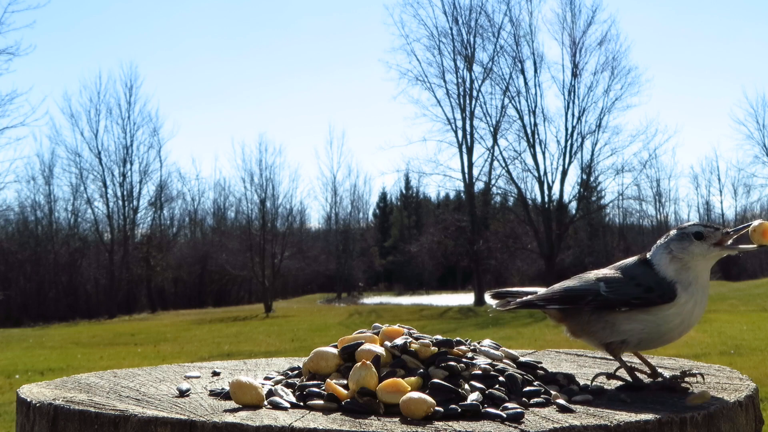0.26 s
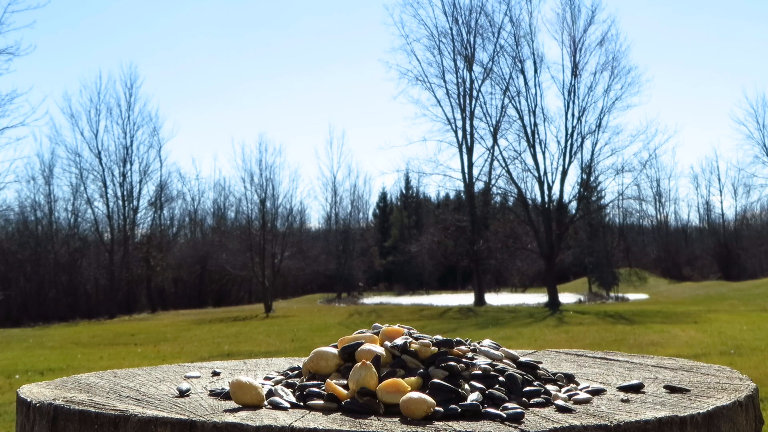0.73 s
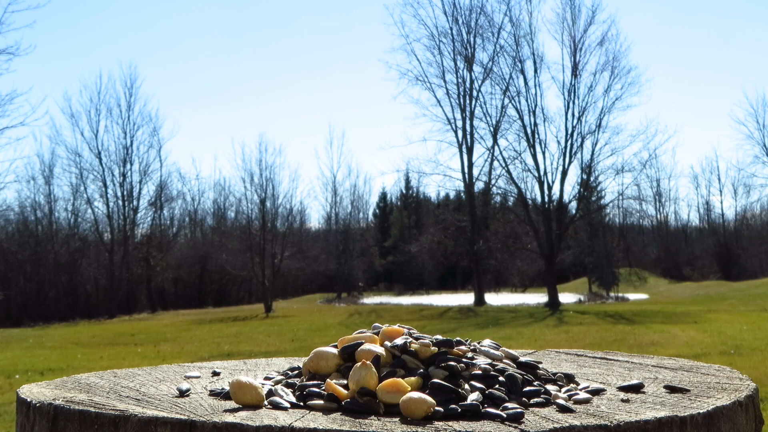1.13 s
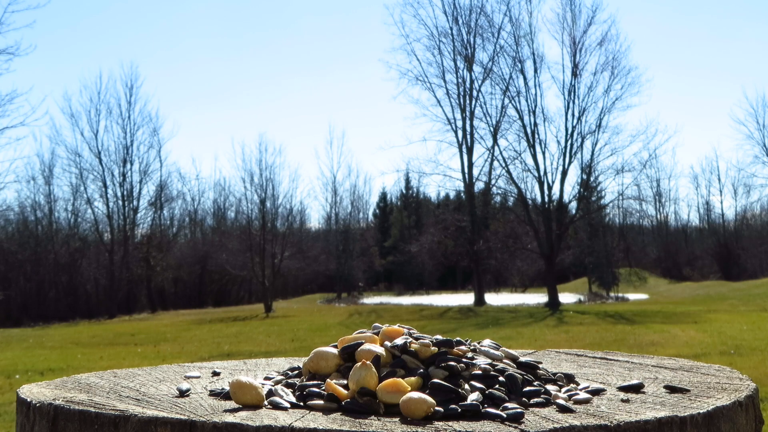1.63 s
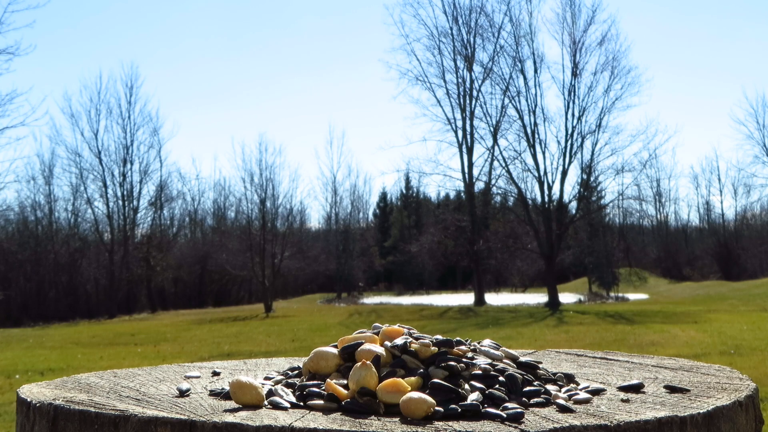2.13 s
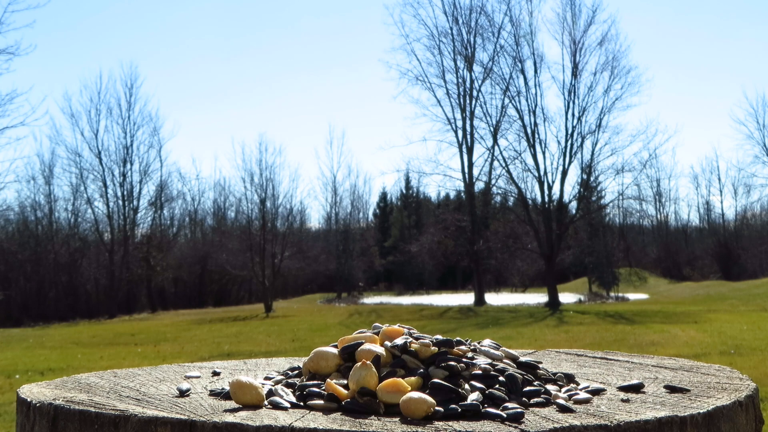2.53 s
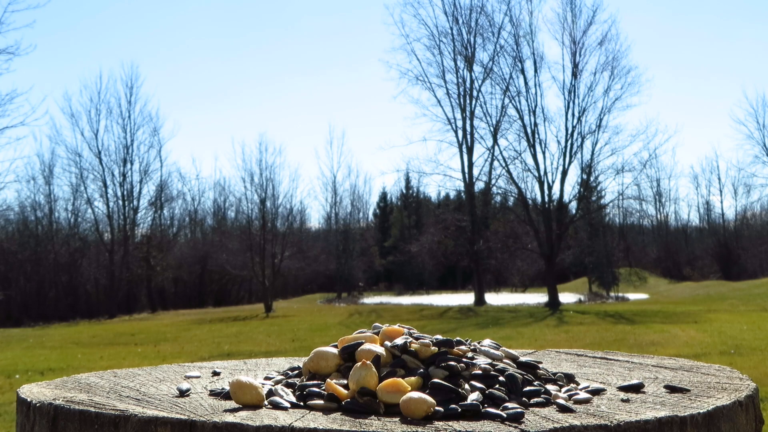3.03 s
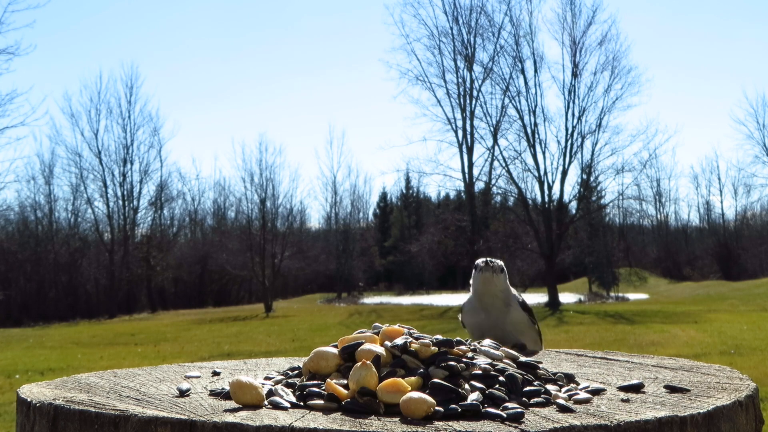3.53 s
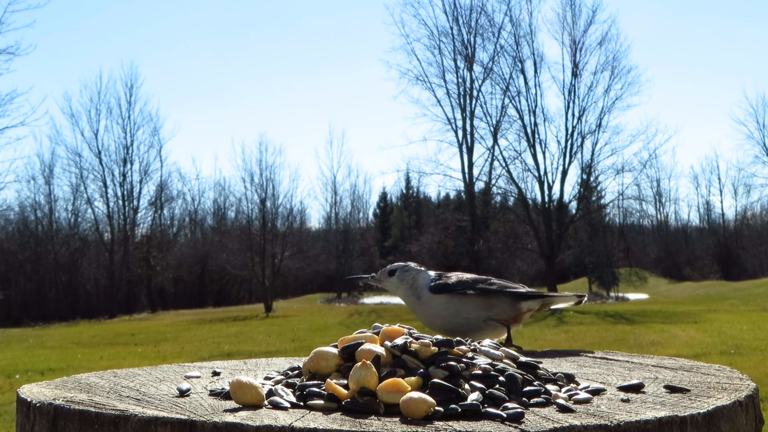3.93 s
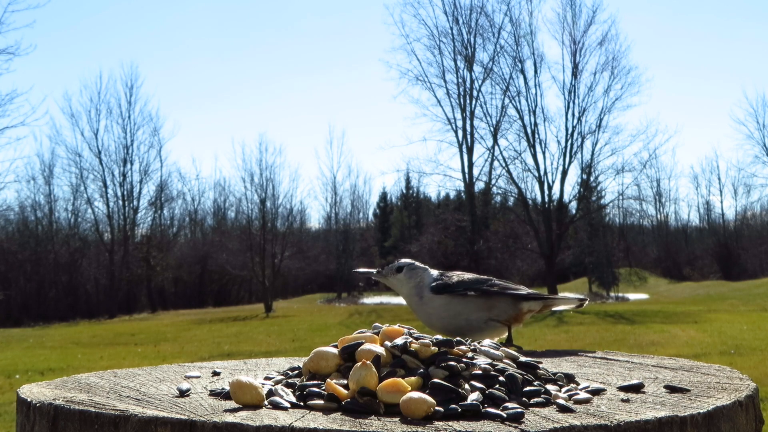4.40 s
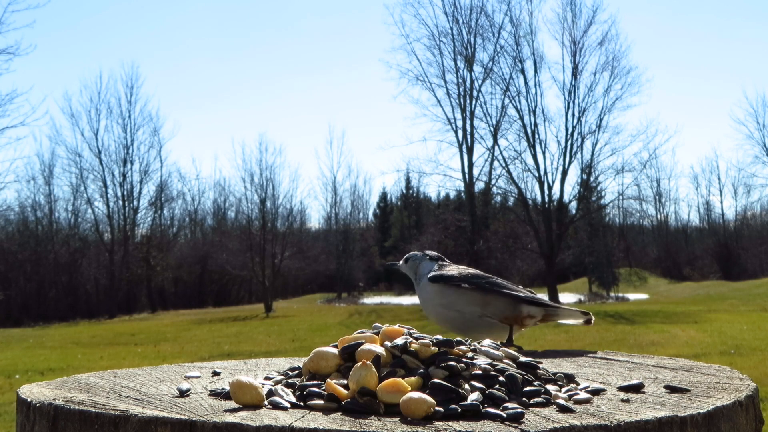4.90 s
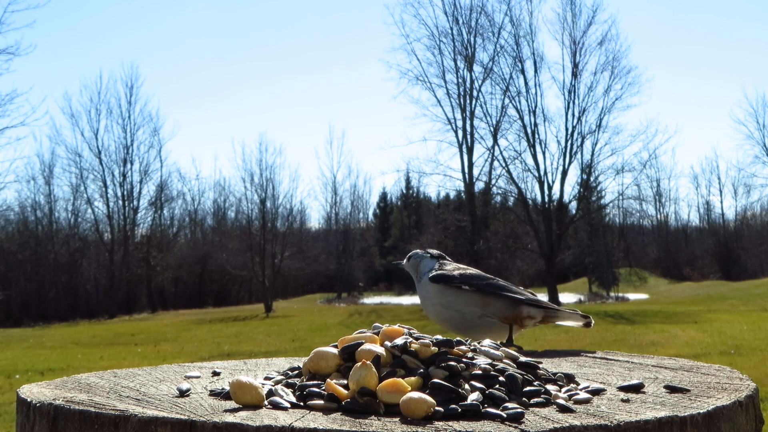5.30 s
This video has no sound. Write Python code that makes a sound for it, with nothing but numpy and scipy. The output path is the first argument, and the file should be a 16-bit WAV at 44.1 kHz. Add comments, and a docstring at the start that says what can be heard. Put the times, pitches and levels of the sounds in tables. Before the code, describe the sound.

Close to the microphone, a small bird's claws tick faintly over seeds on a wooden stump. One sharp snap follows, and it leaves on whirring wings. Three faint, short calls come from afar. The bird flutters softly back, lands with a light tap and gives two louder nasal calls. Far traffic, a soft hiss and a faint hum lie over the open lawn throughout, and a breeze twice brushes the microphone.

```python
"""Far traffic, a soft hiss and a faint hum lie over an open lawn, while one distant vehicle drones away. Close
by, a nuthatch ticks over the seeds of a stump feeder; its feet scuff, and there is one sharp snap. It leaves on
whirring wings whose draft rumbles low, and two calls come from afar, each a harmonic series shaped by throat
and beak. It calls again, flutters back, lands and gives two louder nasal calls, the last followed by a brief
gust."""
import sys
import numpy as np
from scipy import signal
from scipy.fft import rfft, irfft, next_fast_len
from scipy.io import wavfile
from scipy.ndimage import uniform_filter1d

SR = 44100
rng = np.random.default_rng(int(sys.argv[2]) if len(sys.argv) > 2 else 0)


def materialize(psi):
    """Save the field psi as 16-bit PCM at rate SR to the path in sys.argv[1].

    A 1-D psi becomes a single channel; in a 2-D psi each row is a channel.
    """
    bounded = np.clip(np.atleast_2d(psi).T, -1, 1)
    quanta = np.round(bounded * 32767).astype(np.int16)
    wavfile.write(sys.argv[1], SR, quanta)


N = 245195
TIME = np.arange(N) / SR


def undb(db):
    """Amplitude ratio of a level in decibels."""
    return 10 ** (np.asarray(db) / 20)


def unit(x):
    """Normalisation to rms 1."""
    return x / np.sqrt(np.mean(x ** 2) + 1e-30)


def gain_at(hz, points):
    """Gain of a (frequency_hz, level_db) curve on a log axis, falling 12 dB an octave past its end."""
    knots_hz, db = np.transpose(points)
    rolloff = np.maximum(hz / knots_hz[-1], 1) ** 2
    return undb(np.interp(np.log(hz + 1e-9), np.log(knots_hz), db)) / rolloff


def colour(x, points):
    """Zero-phase filtering: the spectrum is multiplied by a gain curve."""
    size = next_fast_len(len(x))
    return irfft(rfft(x, size) * gain_at(np.fft.rfftfreq(size, 1 / SR), points), size)[:len(x)]


def noise(points):
    """Filtered white noise of rms 1."""
    return unit(colour(rng.standard_normal(N), points))


def pan(x, db):
    """Direction by level difference, left minus right."""
    return x * undb(np.array([[db], [-db]]) / 2)


def near(points, side_db):
    """Coherence: noise from a small, close source is mostly alike in both ears."""
    return noise(points) + undb(side_db) * noise(points) * np.array([[1], [-1]])


def diffuse(points):
    """A diffuse field: noise from all around is alike in the bass, wide in the low middle."""
    # side against mid: frequency_hz, gain_db
    width = [(25, -15), (60, -19), (120, -3.5), (250, 1), (400, 4.5), (700, 0), (1250, -5.5), (2400, -5),
             (4400, -6.5), (8000, -3.5), (15000, -1)]
    return noise(points) + colour(noise(points), width) * np.array([[1], [-1]])


def wander(rate_hz):
    """Slow random modulation of rms 1."""
    hold = int(SR / rate_hz)
    return unit(uniform_filter1d(np.repeat(rng.standard_normal(N // hold + 1), hold), hold)[:N])


def bump(centre_s, width_s):
    """A Gaussian envelope of height 1."""
    return np.exp(-((TIME - centre_s) / width_s) ** 2)


def add(out, start_s, x):
    """Superposition of a sound from start_s on."""
    i = max(int(start_s * SR), 0)
    out[..., i:i + x.shape[-1]] += x[..., :N - i]


def traffic_and_air(roar_fall_db_per_s=.51, hiss_fall_db_per_s=.1748):
    """Far sources merge into diffuse noise: roar and hiss ease off, dip together, and the roar swells."""
    # far traffic: frequency_hz, level_db
    roar_spectrum = [(20, -7), (35, -5), (65, 3.5), (120, 2), (240, -1.5), (380, -7), (550, -7.5),
                     (950, -6), (1320, -6), (1480, -14), (2200, -29), (5000, -47)]
    # hiss of the air: frequency_hz, level_db
    hiss_spectrum = [(300, -11), (1500, 2.5), (3000, -2), (5000, -5.5), (7000, -9.5), (9000, -14),
                     (11000, -20), (13000, -26), (16000, -28)]
    lull_db, swell_db = -3.5 * bump(2.587, .15), 2.2 * bump(3.74, .43)
    roar_db = -49 - roar_fall_db_per_s * TIME + lull_db + swell_db + .5 * wander(8.1)
    hiss_db = -55.5 - hiss_fall_db_per_s * TIME + lull_db
    return undb(roar_db) * diffuse(roar_spectrum) + undb(hiss_db) * diffuse(hiss_spectrum)


def vehicle(start_db=-50, fall_db_per_s=9.5):
    """Narrow-band noise decays exponentially as one distant vehicle drones away."""
    # the drone: frequency_hz, level_db
    drone_spectrum = [(100, -25), (200, -18), (235, -2.5), (265, -1), (305, 4.5), (330, -2), (375, -13),
                      (550, -9.5), (1100, -39)]
    return undb(start_db - fall_db_per_s * TIME) * diffuse(drone_spectrum)


def machinery(drift=.01245, waver_db=3):
    """Tones of far machinery are modulated in level and pitch on their way over the lawn."""
    # the hum: pitch_hz, level_db
    tones = [(60, -70), (146, -64), (173, -65), (233, -65)]
    out = np.zeros(N)
    for hz, db in tones:
        amplitude = undb(db + waver_db * wander(5.5))
        pitch_hz = hz * (1 + drift * wander(12))
        out += amplitude * np.sin(2 * np.pi * np.cumsum(pitch_hz) / SR)
    return out


def scratch(hz, q=1.1, side_db=-8):
    """Friction noise of a claw on wood, passed twice through one broad resonance."""
    resonance = signal.iirpeak(hz, q, fs=SR)
    once = signal.lfilter(*resonance, rng.standard_normal((2, N)))
    mid, side = unit(signal.lfilter(*resonance, once))
    return mid + undb(side_db) * side * np.array([[1], [-1]])


def claws(decay_cycles=20, hind_lag_s=.009, hind_db=-6):
    """Damped impacts: in each step the front claws strike, then the hind claw more softly."""
    # steps on wood and seed husks: start_s, level_db, resonance_hz
    steps = [(.172, -50, 8600), (.2725, -50, 6000), (.3747, -47, 5500), (3.628, -46, 2400),
             (3.662, -55, 4500)]
    out, t = np.zeros((2, N)), np.arange(SR // 20) / SR
    for start_s, db, hz in steps:
        contact = np.zeros(N)
        tick = undb(db) * np.exp(-t * hz / decay_cycles)
        add(contact, start_s, tick)
        add(contact, start_s + hind_lag_s, tick * undb(hind_db))
        out += contact * scratch(hz)
    return out


def scuff():
    """Sliding friction: the feet scrape softly as the bird leans over the rim."""
    return undb(-57) * bump(.605, .063) * scratch(hz=3900)


def snap(start_s=.5904, first_hz=4900, last_hz=1900, crack_hz=3900):
    """A damped transient at the stump's rim: a hard crack, then a gritty ring that falls in pitch."""
    # grit in the ring: frequency_hz, level_db
    grit_spectrum = [(300, -1.5), (1000, -5), (2000, -6), (3200, 6), (4000, -4), (4900, 4), (6000, -18),
                     (8400, -10), (9500, -39)]
    rise_s, crack_decay_s, ring_decay_s, glide_s = .0002, .0004, .0025, .0035
    out, t = np.zeros((2, N)), np.arange(SR // 20) / SR
    hz = last_hz + (first_hz - last_hz) * np.exp(-t / glide_s)
    grit = near(grit_spectrum, side_db=-5)[:, :len(t)]
    ring = (np.sin(2 * np.pi * np.cumsum(hz) / SR) + grit) * np.exp(-t / ring_decay_s)
    crack = np.sin(2 * np.pi * crack_hz * t) * np.exp(-t / crack_decay_s)
    attack = 1 - np.exp(-t / rise_s)
    add(out, start_s, (undb(-26) * ring + undb(-8.5) * crack) * attack)
    return pan(out, db=-1.5)


def flight(first_s, period_s, slowing_s, nearest_s, passing_s, db, slap_s, hiss_db, thump_db, count):
    """Distance and directivity on a straight path: far wingbeats are weak and blurred, tail-on ones dull."""
    loss_db_per_doubling, blur_power = 14.5, .85
    beat = np.arange(count)
    time_s = first_s + period_s * beat + slowing_s * beat * (beat - 1) / 2
    along = (time_s - nearest_s) / passing_s  # in units of the least distance
    distance = np.hypot(1, along)
    tail_on = along / distance
    level_db = db - loss_db_per_doubling * np.log2(distance)
    width_s = slap_s * distance ** blur_power
    return np.transpose([time_s, level_db, width_s, hiss_db - 6.5 * tail_on, thump_db + 6 * tail_on])


def wings(rustle_db=-15, rustle_s=.074, thump_lag_s=.004, thump_s=.007):
    """Each stroke slaps the feathers, leaves a rustle and puffs out air; incoherent noises add in power."""
    # slap and rustle of feathers: frequency_hz, level_db
    feather_spectrum = [(200, -22), (450, -14), (750, 6.5), (1150, -6), (1600, 2.5), (2300, -3.5),
                        (3400, 1), (4600, -5.5), (6500, -5.5), (12000, -41)]
    # hiss of feathers: frequency_hz, level_db
    hiss_spectrum = [(2500, -25), (5000, -7), (8500, 11.5), (11000, 4), (14000, -6), (16000, -18)]
    # puff of air under a wing: frequency_hz, level_db
    thump_spectrum = [(30, -10), (100, -5), (300, 3), (480, -9), (780, -8), (1100, -20)]
    take_off = flight(first_s=.7475, period_s=.0485, slowing_s=.0015, nearest_s=.808, passing_s=.078,
                      db=-30.5, slap_s=.0015, hiss_db=-5, thump_db=-5, count=6)
    landing = flight(first_s=3.419, period_s=.042, slowing_s=0, nearest_s=3.62, passing_s=.2,
                     db=-55, slap_s=.012, hiss_db=-3.5, thump_db=-1, count=5)
    feather_power, hiss_power, thump_power = np.zeros((3, N))
    for time_s, db, width_s, hiss_db, thump_db in [*take_off, *landing]:
        t = TIME - time_s
        slap = np.exp(-np.abs(t) / np.where(t < 0, width_s, 2 * width_s))
        rustle = undb(rustle_db) * np.exp(-np.abs(t) / np.where(t < 0, 2 * width_s, rustle_s))
        power = undb(db) ** 2 * (slap ** 2 + rustle ** 2)
        feather_power += power
        hiss_power += power * undb(hiss_db) ** 2
        thump_power += undb(db + thump_db) ** 2 * np.exp(-((t - thump_lag_s) / thump_s) ** 2)
    return (undb(-1) * np.sqrt(feather_power) * near(feather_spectrum, side_db=-19)
            + undb(-4) * np.sqrt(hiss_power) * near(hiss_spectrum, side_db=-4)
            + undb(-4) * np.sqrt(thump_power) * near(thump_spectrum, side_db=-21))


def ports(pair, shade_db):
    """Path difference and shadowing: the left microphone port gets the bird sooner and with more treble."""
    hz = np.fft.rfftfreq(N, 1 / SR)
    phase_lead = 1.1 * np.tanh(hz / 4500)
    left = np.exp(.5j * phase_lead) * gain_at(hz, [(3500, 0), (9000, shade_db / 2), (SR, shade_db / 2)])
    return irfft(rfft(pair) * np.array([left, 1 / left]), N)


def air_rumbles():
    """Brief low rumbles: the draft of the wings just after take-off, and later a gust of wind brushing the
    microphone."""
    # gusts: centre_s, level_db, width_s
    gusts = [(.92, -50.5, 0.16), (5.42, -50, 0.048)]
    # wind rumble: frequency_hz, level_db
    gust_spectrum = [(15, -12), (45, 6), (100, 12), (160, -22), (400, -45)]
    envelope = sum(undb(db) * bump(centre_s, width_s) for centre_s, db, width_s in gusts)
    return envelope * near(gust_spectrum, side_db=-10)


def pitch_arch(progress, sag, crest=.36, rise=.067):
    """Frequency modulation as a fraction of the top pitch: a quick lift, a rounded crest, then a sag."""
    opening = rise * (1 - progress / crest) ** 2
    closing = sag * ((progress - crest) / (1 - crest)) ** 2
    return 1 - np.where(progress < crest, opening, closing)


def nasal_tone(progress, pitch_hz, notch_hz, notch_db, beak_hz, beak_db, overtones_db):
    """Source and filter: 15 harmonics slide through the throat's resonances as progress runs 0 to 1."""
    # response of throat and beak: frequency_hz, gain_db
    throat = [(500, -47), (930, -20), (1400, -6.5), (1800, 1.5), (2700, -3), (3000, -1), (3650, -3),
              (4700, -14), (5600, -19.5), (6700, -42.5), (8200, -40.5), (9800, -35.5), (11800, -37),
              (13200, -64)]
    notch_width_hz, beak_width_hz, dulling_db = 400, 420, 9
    waver = .003 * unit(uniform_filter1d(rng.standard_normal(len(progress)), size=60))
    partial_hz = np.arange(1, 16)[:, None] * pitch_hz * (1 + waver)
    # each call cuts one band and lifts another by its own amount; a negative amount works the other way
    dip_db = -notch_db * np.exp(-((partial_hz - notch_hz) / notch_width_hz) ** 2)
    lift_db = beak_db * np.exp(-((partial_hz - beak_hz) / beak_width_hz) ** 2)
    treble_db = (overtones_db - dulling_db * (progress - .5)) * (partial_hz > 5000)
    rasp = 1 + .049 * unit(uniform_filter1d(rng.standard_normal(partial_hz.shape), size=30))
    amplitude = gain_at(partial_hz, throat) * undb(dip_db + lift_db + treble_db) * rasp
    phase = 2 * np.pi * np.cumsum(partial_hz, axis=1) / SR
    return -np.sum(amplitude * np.cos(phase), axis=0)


def calls(near_db=-20, echo_db=-17.5, echo_growth=.53, swell_power=.71):
    """Each call swells and fades in one arch of pitch; the ratio of echo to direct sound grows with range."""
    # calls: start_s, length_s, top_pitch_hz, sag_fraction, level_db, notch_hz, notch_depth_db,
    # beak_hz, beak_db, overtones_db, left_minus_right_db
    notes = [(1.147, 0.043, 870, 0.09, -41.5, 3620, 12, 2600, 2, 4, -5),
             (1.73, 0.035, 882, .08, -53, 3400, 4, 4450, 7, 3, -1.5),
             (3.078, 0.037, 982, 0.1, -37, 4060, -3, 5020, 13.5, 1, -2),
             (3.929, .039, 940.7, 0.16, -19.5, 4150, 2, 5500, -9.5, 2, -.3),
             (5.31, 0.037, 924, 0.2, -26.5, 4270, 11, 3530, 5.5, -8, -.6)]
    direct, to_garden = np.zeros((2, N)), np.zeros(N)
    for start_s, length_s, top_hz, sag, db, *timbre, pan_db in notes:
        progress = np.linspace(0, 1, int(length_s * SR))
        tone = nasal_tone(progress, top_hz * pitch_arch(progress, sag), *timbre)
        note = undb(db) * np.abs(np.sin(np.pi * progress)) ** swell_power * tone
        add(direct, start_s, pan(note, pan_db))
        add(to_garden, start_s, note * undb(echo_db + echo_growth * (near_db - db)))
    return ports(direct, shade_db=7) + garden_echo(to_garden)


def garden_echo(x, early_s=.028, early_t60_s=.18, late_t60_s=.51, bounce_s=.035, bounce_db=-9.5):
    """Reflection: scatter from things close by, one clear bounce and a faint tail from the trees."""
    t = np.arange(SR // 2) / SR
    early = undb(-60 * t / early_t60_s) / (1 + np.exp(np.minimum((t - early_s) / .0037, 50)))
    late = undb(-13 - 60 * t / late_t60_s)
    envelope = (early + late) * (t > .004)
    response = rng.standard_normal((2, len(t))) * envelope / np.sqrt(np.sum(envelope ** 2))
    response[:, int(bounce_s * SR)] += undb(bounce_db)
    return signal.fftconvolve(x[None], response, axes=1)[:, :N]


def scene():
    """Superposition of the bird and the lawn around it."""
    bird = calls() + claws() + scuff() + snap() + ports(wings(), shade_db=4)
    return bird + traffic_and_air() + vehicle() + air_rumbles() + machinery()


def record(dry, cutoff_hz=15700):
    """Band limiting: the microphone softens the highest treble, and a steep low-pass cuts the top."""
    # microphone response: frequency_hz, gain_db
    response = [(11000, 0), (12500, -4), (14000, -14), (16000, -6)]
    softened = np.array([colour(channel, response) for channel in dry])
    return signal.sosfilt(signal.ellip(8, .2, 70, cutoff_hz, fs=SR, output="sos"), softened)


dry = scene()
out = record(dry)
materialize(out)
```